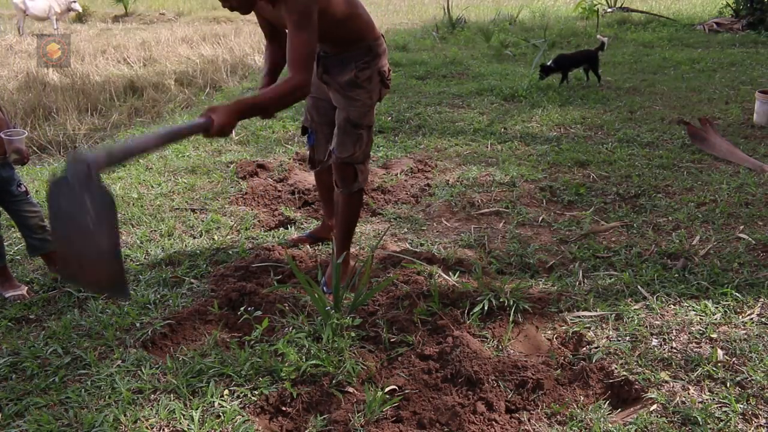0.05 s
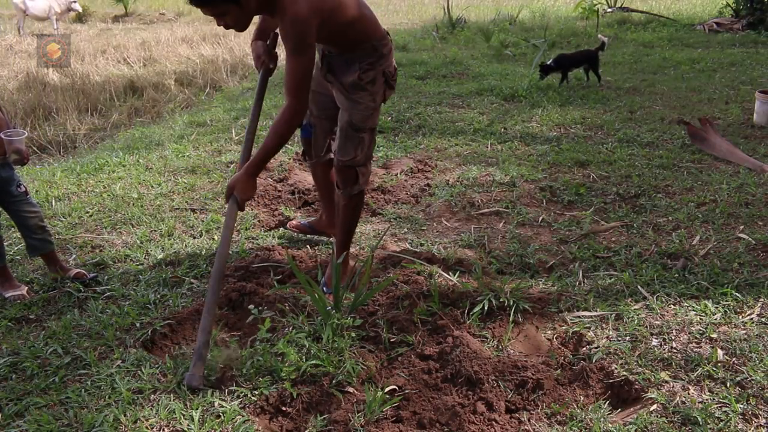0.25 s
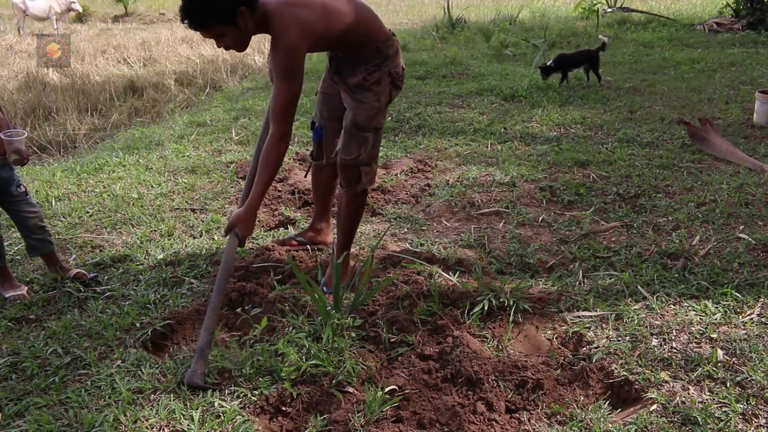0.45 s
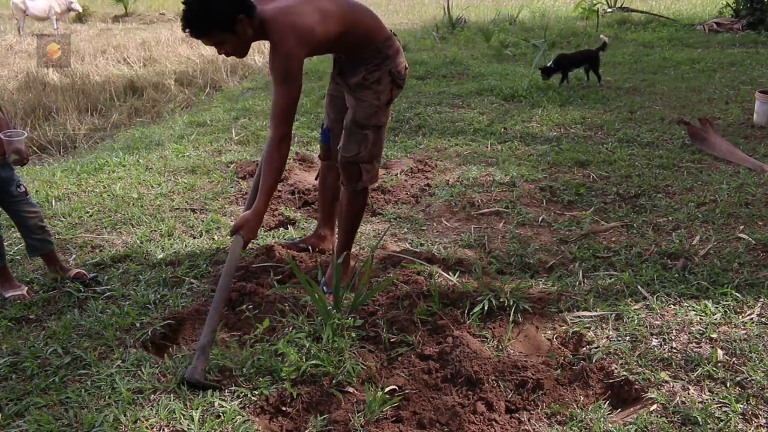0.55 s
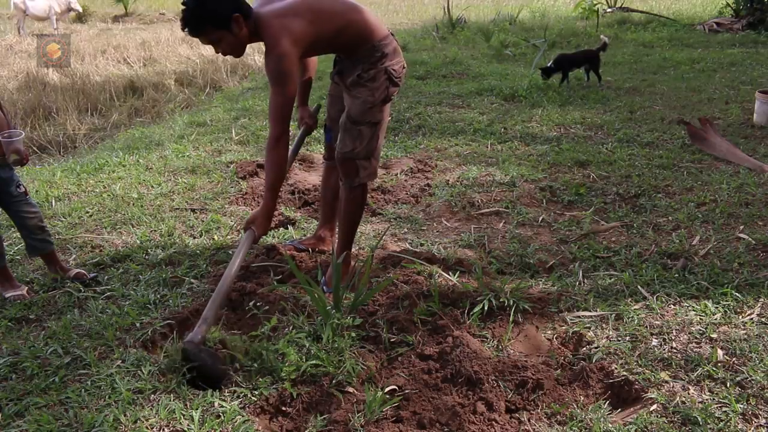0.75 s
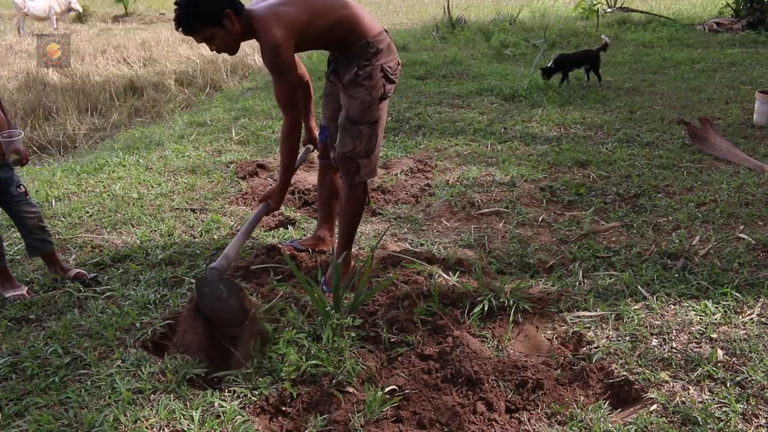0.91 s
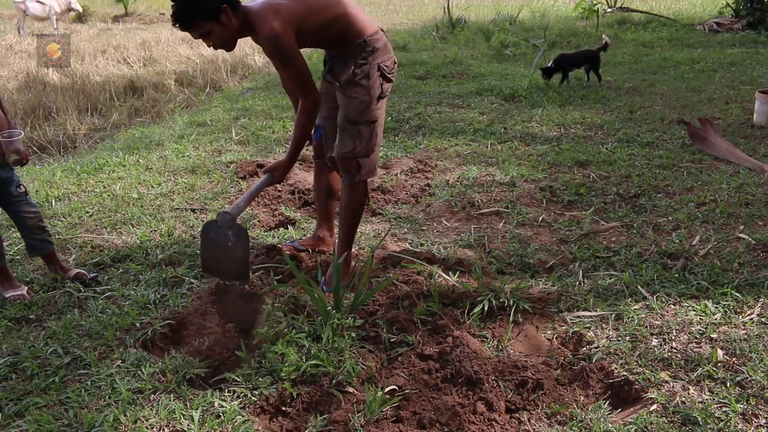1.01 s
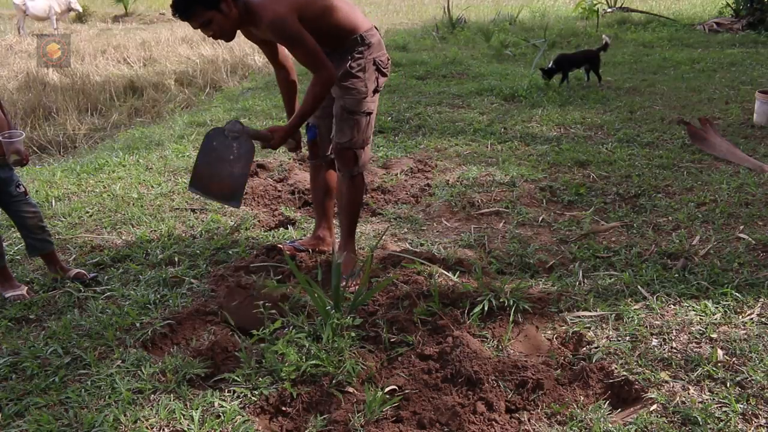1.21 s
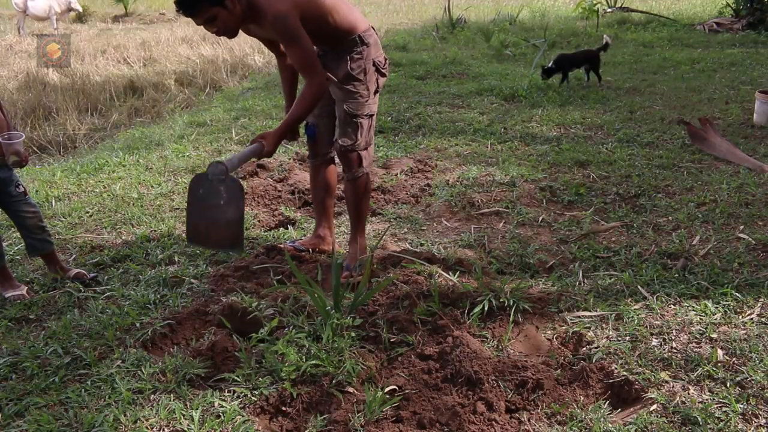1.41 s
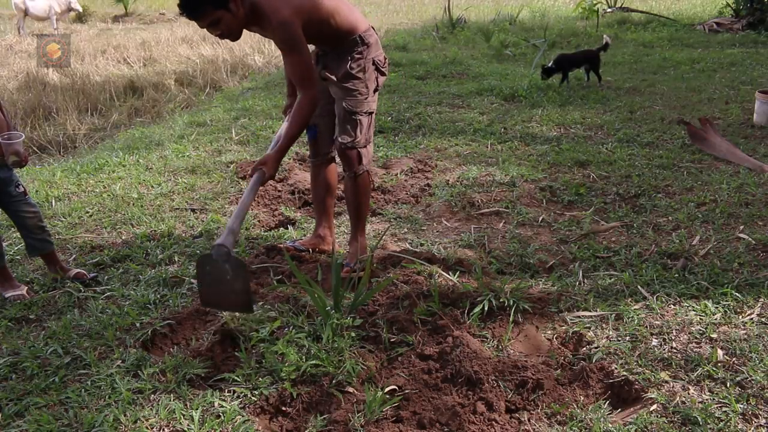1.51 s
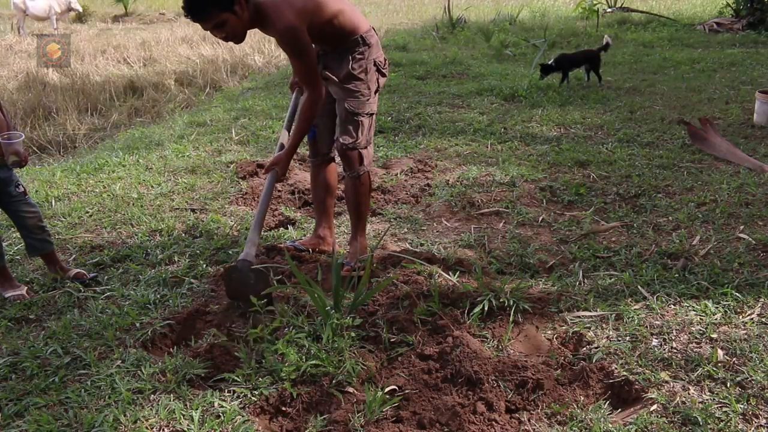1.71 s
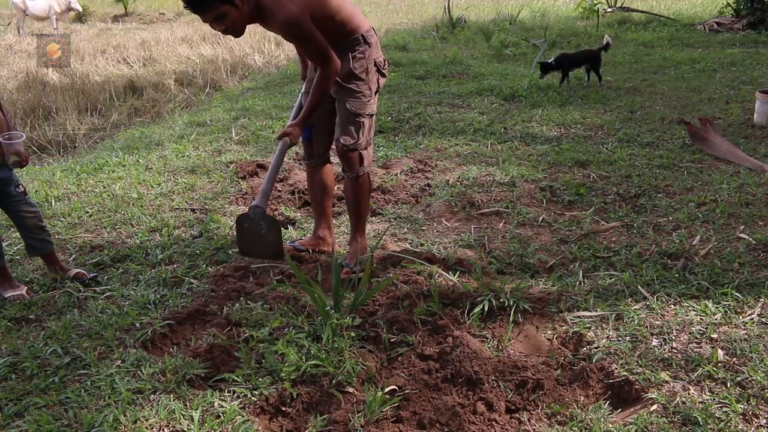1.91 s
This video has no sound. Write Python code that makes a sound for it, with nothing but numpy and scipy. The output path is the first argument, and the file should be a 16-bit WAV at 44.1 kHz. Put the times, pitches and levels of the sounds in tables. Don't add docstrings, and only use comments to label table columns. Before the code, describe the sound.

A hoe bites hard into dry soil, crumbles a clod loose, then lightly taps the ground

```python
import sys
import numpy as np
from scipy import signal
from scipy.fft import rfft, irfft
from scipy.io import wavfile

SR = 44100
rng = np.random.default_rng(int(sys.argv[2]) if len(sys.argv) > 2 else 0)


def level_to_linear(level):
    exponent = np.asarray(level, float) / 20
    return 10 ** exponent


def persist_wave(psi):
    counts = np.round(np.clip(psi, -1, 1) * 32767).astype(np.int16)
    wavfile.write(sys.argv[1], SR, np.atleast_2d(counts).T)


N = 85995
GRAINS_PER_S = 9000


def rms_one(x):
    return x / np.sqrt(np.mean(x ** 2) + 1e-20)


def at_hz(points, hz):
    p = np.array(points, float)
    return np.interp(np.log(hz + 1), np.log(p[:, 0] + 1), p[:, 1])


def coloured(x, spectrum):
    gain = level_to_linear(at_hz(spectrum, np.fft.rfftfreq(N, 1 / SR)))
    return rms_one(irfft(rfft(x) * gain, N))


def drift(rate_hz):
    r = np.exp(-2 * np.pi * rate_hz / SR)
    noise = rng.standard_normal(N + SR)
    return rms_one(signal.lfilter([1], [1, -2 * r, r * r], noise)[SR:])


def resonance(x, hz, width_hz):
    r = np.exp(-np.pi * width_hz / SR)
    poles = [1, -2 * r * np.cos(2 * np.pi * hz / SR), r * r]
    return signal.lfilter([(1 - r * r) / 2, 0, (r * r - 1) / 2], poles, x)


def since(start_s):
    return np.maximum(np.arange(N) / SR - start_s, 0)


def swell(peak_s, rise_s, fall_s):
    t = np.arange(N) / SR - peak_s
    return level_to_linear(np.where(t < 0, 60 * t / max(rise_s, .002), -60 * t / max(fall_s, .002)))


def grains(per_s):
    spread_db = 4
    sizes = level_to_linear(spread_db * np.minimum(rng.exponential(1, N), 4)) * rng.choice([-1, 1], N)
    return rms_one(sizes * (rng.random(N) < per_s / SR))


def stroke(fineness):
    # peak t/s, rise t/s per 60 dB, fall t/s per 60 dB, level/dB,
    # fine sand above it level/dB
    strokes = [(0.171, 1, -0.4, -62.5, -33), (0.211, -0.39, -0.1, -51, 13),
               (0.2134, -0.0045, .08, -32.5, -5.5), (0.2159, -0.0055, 0.0382, -23.5, -1.5),
               (0.23, 0, 0.1163, -33.5, 0.5), (0.273, 0.02, .5, -48.5, -3), (.58, 0, 1, -63, -17.5),
               (.74, 0.53, 0.3, -53.5, -12), (0.884, 0.4, 0.37, -55, -10), (0.8962, 0.05, 0.02, -48, 2.5),
               (.976, 0.34, 0, -56.5, -9), (0.986, 0.08, 0.15, -46, -5.5), (1.017, 0.37, 0.05, -54.5, 4.5),
               (1.024, 0.1, 0.22, -57.5, 7), (1.03, 0.18, 0, -60, 14.5), (1.041, -0.35, 0.4, -59.5, -8),
               (1.22, 0.6, 0.5, -60, 0.5), (1.414, 0.27, 0.23, -52, -17), (1.698, 0.01, 0.1, -42.5, 0),
               (1.7077, 0.03, 0.0225, -32, -6), (1.71, .01, 0.14, -55, -3), (1.72, -0.17, 0.54, -53.5, 1),
               (1.814, 0, 0.24, -62, 2)]
    return sum(level_to_linear(db + fineness * sand_db) * swell(peak, rise, fall)
               for peak, rise, fall, db, sand_db in strokes)


def handle():
    # t/s, level/dB, contact centre f/Hz
    blows = [
        (0.218, -1.5, 865),
        (0.2209, -14.5, 422),
        (0.2235, -17, 302),
        (.226, -17.5, 117),
        (0.2354, -15.5, 400),
        (0.228, -22, 1250),
        (.2327, -18.5, 1000),
        (.248, -24.5, 227),
        (1.7102, -21.5, 420),
        (1.7152, -35, 350),
    ]
    # f/Hz, level/dB, 60 dB decay t/s
    handle_modes = [(105.6, -4.5, 0.12), (182, -10, 0.06), (252, 5, 0.068), (320, 5, 0.023),
                    (428, -2, 0.029), (607, -6.5, 0.04), (736, -6.5, 0.043), (913, 2, 0.01),
                    (1000, -8.5, 0.036), (1275, -9, 0.053)]
    out = np.zeros(N)
    for start, db, contact_hz in blows:
        t = since(start)
        luck_db = rng.normal(0, 0.98, len(handle_modes))
        modes = sum(level_to_linear(level + luck - 60 * t / t60) * np.sin(2 * np.pi * hz * t)
                    for (hz, level, t60), luck in zip(handle_modes, luck_db))
        out += level_to_linear(db - 12.0) * resonance(modes, contact_hz, 0.52 * contact_hz)
    return out


def hiss():
    # f/Hz, level/dB per Hz
    grit_spectrum = [(300, -39), (500, -8.5), (1000, -8.5), (1600, -10.5), (3500, -4), (5000, -13.5),
                     (9000, -17.5), (16000, -40)]
    sand_spectrum = [(2500, -11), (4500, -2.5), (9000, -4.5), (16000, -9.5)]
    grit = coloured(grains(GRAINS_PER_S), grit_spectrum) * stroke(0)
    sand = coloured(grains(GRAINS_PER_S), sand_spectrum) * stroke(0.72)
    return grit + sand


def ringing():
    # peak t/s, rise t/s per 60 dB, fall t/s per 60 dB, level/dB, upper modes level/dB
    rings = [
        (0.215, 0.05, 0.12, -41, -2),
        (0.22, 0.04, 0.0833, -27, -14),
        (0.235, 0.1, 0.1747, -39, -10),
        (.988, 0.85, 0.23, -47, 2),
        (1.003, 0.2, 0.35, -51.5, -10),
        (1.025, 0.5, 0.25, -51, -4),
        (1.42, 0.5, 0.4, -53.5, -10),
        (1.699, 0.0542, 0.27, -43, 3),
        (1.705, 0.07, 0.066, -35, 1),
        (1.815, 0.1, 0.28, -48, 1),
    ]
    # f/Hz, width f/Hz, level/dB
    blade_modes = [(1500, 35, -7), (1957, 54, -4), (2330, 190, 1.5), (3296, 43, -10), (3920, 120, -3),
                   (4730, 120, -6.5), (5090, 39, -6.5), (6260, 79, -4), (7200, 44, -4.5), (7750, 72, -4),
                   (7800, 63, -14), (8846, 290, -3), (10540, 210, -7), (11040, 34, -17)]
    lower, upper = [sum(level_to_linear(db + up * upper_db) * swell(peak, rise, fall)
                        for peak, rise, fall, db, upper_db in rings) for up in (0, 1)]
    rain = grains(GRAINS_PER_S / 3)
    out = np.zeros(N)
    for k, (hz, width_hz, level) in enumerate(blade_modes):
        drive = upper if hz > 4800 else lower
        hits = np.roll(rain, 997 * k) * drive
        even_power = np.sqrt(SR / width_hz / 2.7)
        out += level_to_linear(level - 11.0) * even_power * resonance(hits, hz, width_hz)
    return out


def ticks():
    # t/s, peak level/dB, f/Hz, width f/Hz
    stones = [(.218, -10, 853, 260), (.2178, -18.5, 3280, 490), (.2138, -29, 2400, 500),
              (0.21, -32, 1800, 560), (0.22, -24, 1000, 54), (0.22, -16, 3044, 134),
              (.2212, -19, 2600, 180), (.2176, -21, 2730, 300), (.2172, -32, 3380, 300),
              (.231, -19, 3000, 200), (.7995, -31, 510, 300), (.8075, -38, 2600, 900),
              (0.8098, -29.5, 2130, 330), (.882, -35.5, 2100, 500), (.8955, -37, 3100, 400),
              (0.987, -29.5, 4100, 500), (.9898, -35, 2600, 500), (0.9923, -34, 2200, 500),
              (.9925, -39, 6000, 50), (1.004, -47, 5900, 40), (1.013, -45, 6150, 60),
              (1.017, -44, 5800, 140), (1.024, -42, 5500, 60), (1.027, -37, 5120, 46),
              (0.9871, -39, 1170, 400), (.976, -41, 3200, 500), (1.018, -42, 3900, 900),
              (1.022, -33, 4000, 1000), (1.03, -36, 7000, 3000), (1.024, -30, 8930, 170),
              (1.157, -46, 9000, 6000), (1.6962, -35, 3280, 90), (1.7012, -37, 3900, 300),
              (1.7032, -24, 4000, 220), (1.706, -24.5, 4200, 200), (1.7071, -29.5, 2340, 93),
              (1.7078, -29.5, 4400, 460), (1.7094, -16, 3760, 1200), (1.7105, -29, 620, 210),
              (1.818, -46.5, 6000, 5000)]
    out = np.zeros(N)
    for start, db, hz, width_hz in stones:
        t = since(start)
        out += level_to_linear(db) * np.exp(-np.pi * width_hz * t) * np.sin(2 * np.pi * hz * t)
    return out


def earth():
    # peak t/s, rise t/s per 60 dB, fall t/s per 60 dB, level/dB
    crumbles = [
        (.16, 0.4, 0.4, -55.5),
        (0.223, 0.03, 0.0665, -22.5),
        (0.312, 0.24, 0.07, -48),
        (.73, 0.3, 0.26, -51.5),
        (0.881, 0.55, 0.33, -51),
        (.99, -1, -1, -64),
        (1.709, 0.11, 0.14, -45.5),
    ]
    # t/s, peak level/dB, f/Hz
    clods = [(0.526, -33.5, 415), (0.655, -36, 470), (0.728, -36, 239), (0.781, -33, 280),
             (.785, -38.5, 330), (0.8038, -30.5, 810), (0.8063, -37, 400), (0.8156, -44, 400),
             (.835, -39, 500), (0.839, -40, 597), (0.862, -35.5, 320), (0.871, -38, 303), (0.878, -34, 352),
             (.882, -37, 450), (0.984, -36.5, 300), (1.018, -38.5, 227), (1.151, -41, 248)]
    # f/Hz, level/dB per Hz
    soil_spectrum = [(120, -6), (250, 1.5), (500, -4.5), (1000, -2.5), (1500, -10.5), (3000, -27.5)]
    lumps_per_s, delay_s, cycles_per_60_db = 1500, .004, 4.5
    crumbs = coloured(grains(lumps_per_s), soil_spectrum)
    out = crumbs * sum(level_to_linear(db) * swell(peak, rise, fall) for peak, rise, fall, db in crumbles)
    for start, db, hz in clods:
        t = since(start + delay_s)
        knock = np.sin(2 * np.pi * hz * t) + 0.22 * np.sin(2 * np.pi * 1.7 * hz * t)
        puff = 0.26 * crumbs * (t > 0)
        out += level_to_linear(db - 60 * t * hz / cycles_per_60_db) * (knock + puff)
    return out


def spray():
    # f/Hz, level/dB per Hz
    spray_spectrum = [(3000, -19), (6000, -7), (10000, 1.5), (16000, -5.5)]
    sides = [coloured(grains(GRAINS_PER_S), spray_spectrum) * level_to_linear(db) for db in (4, -3)]
    return np.array(sides) * stroke(0.86) * level_to_linear(-4.5)


def birds():
    # t/s, length t/s, f/Hz, level/dB
    chips = [
        (0.501, 0.027, 3530, -56.5),
        (.745, 0.039, 4230, -57),
        (1.385, 0.04, 3590, -56),
        (1.585, .04, 2900, -64),
    ]
    husk = 0.49 + 0.87 * drift(110)
    out = np.zeros(N)
    for middle, length, hz, db in chips:
        t = np.arange(N) / SR - middle
        whistle = np.sin(2 * np.pi * (hz * t - 900 * t ** 2))
        out += level_to_linear(db) * np.exp(-(t / length * 2) ** 2) * whistle
    return husk * out


def field():
    # f/Hz, level/dB per Hz
    air_spectrum = [(15, -47), (25, -14), (92, -9), (134, -5), (309, -17), (489, -19), (5880, -29),
                    (8360, -28.5), (16000, -36)]
    # f/Hz, width f/Hz, level/dB
    engine = [(125, 7.3, -71), (142, 5, -66), (78, 19, -62)]
    # f/Hz, left-right likeness [0 to 1]
    likeness = [(60, 1), (240, 0.89), (950, 0.51), (3770, 0.078), (15000, 0.023)]
    alike = np.clip(at_hz(likeness, np.fft.rfftfreq(N, 1 / SR)), 0, 1)
    mid, side = rfft(rng.standard_normal((2, N)))
    pair = np.sqrt(1 + alike) * mid + np.sqrt(1 - alike) * side * [[1], [-1]]
    white = irfft(pair, N) / np.sqrt(2)
    out = coloured(white, air_spectrum) * level_to_linear(-52 + 1.0 * drift(5.6))
    for hz, width_hz, db in engine:
        out += level_to_linear(db) * rms_one(resonance(white, hz, width_hz))
    insect_hz, insect_width_hz, insect_db = 8360, 1300, -65
    band = resonance(white, insect_hz, insect_width_hz)
    band = resonance(band, insect_hz, insect_width_hz)
    return out + level_to_linear(insect_db + 1.2 * drift(5.6)) * rms_one(band)


def ports(x):
    # f/Hz, left minus right level/dB
    port_tilt = [(60, .1), (1000, 1.5), (3000, 0), (6000, 0.5), (15000, 7)]
    bass_cut_hz, lag_s, scatter_db = 99, 3.8e-5, -9
    hz = np.fft.rfftfreq(N, 1 / SR)
    half = level_to_linear(at_hz(port_tilt, hz) / 2) * np.exp(1j * np.pi * hz * lag_s)
    tail = np.diff(rng.standard_normal((2, 400)) * level_to_linear(-.1 * np.arange(400)))
    tail = tail / np.sqrt(np.sum(tail ** 2, axis=1, keepdims=True))
    scatter = rfft(tail, N) * level_to_linear(scatter_db)
    x = signal.sosfilt(signal.butter(3, bass_cut_hz, "high", fs=SR, output="sos"), x)
    return irfft(rfft(x) * (np.array([half, 1 / half]) + scatter), N)


def scene():
    blade = hiss() + ringing() + ticks()
    return ports(handle() + blade + earth() + birds()) + spray() + field()


def roll_off(x):
    return signal.sosfilt(signal.butter(12, 16980, fs=SR, output="sos"), x)


def record(dry):
    low_pass = signal.ellip(14, .3, 70, 15920, fs=SR, output="sos")
    mix = signal.sosfilt(low_pass, dry)
    return roll_off(mix)


dry = scene()
out = record(dry)
persist_wave(out)
```